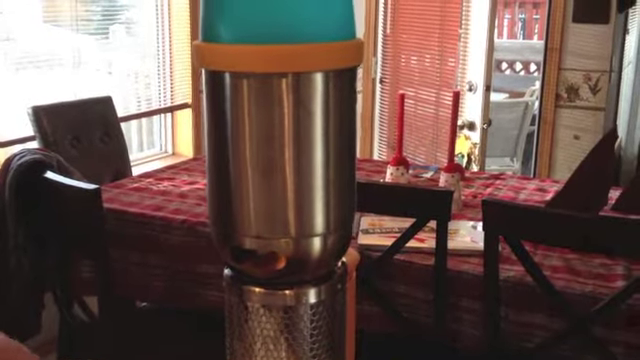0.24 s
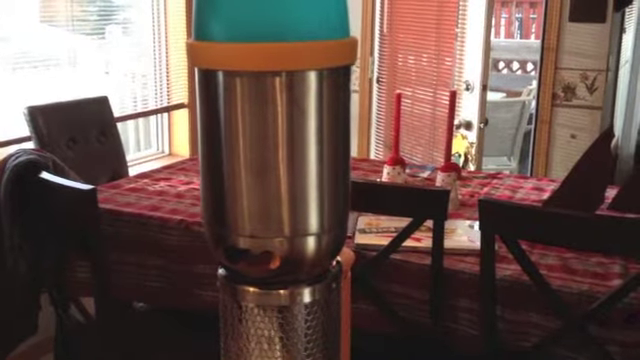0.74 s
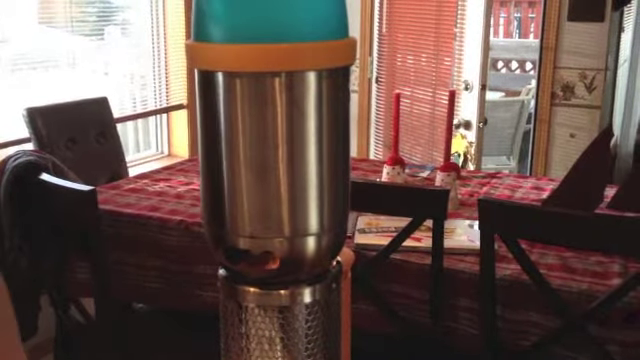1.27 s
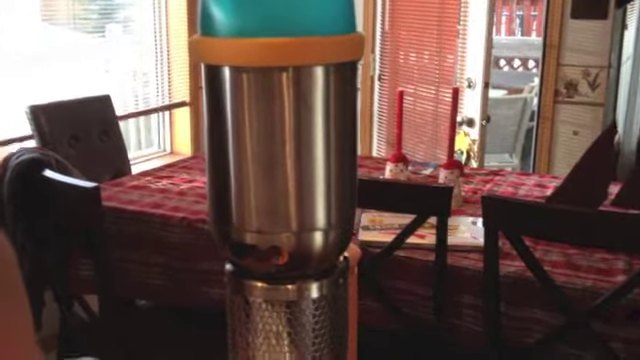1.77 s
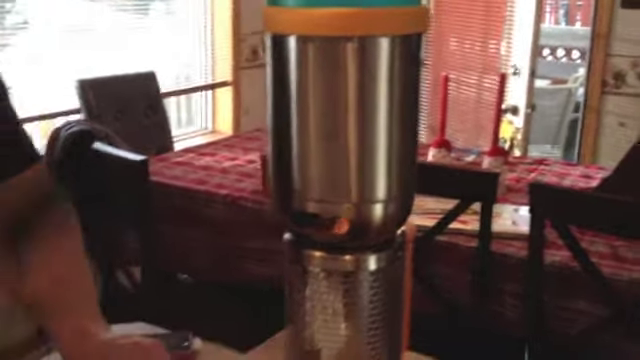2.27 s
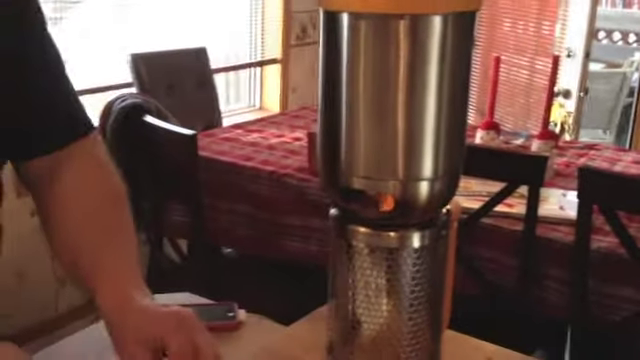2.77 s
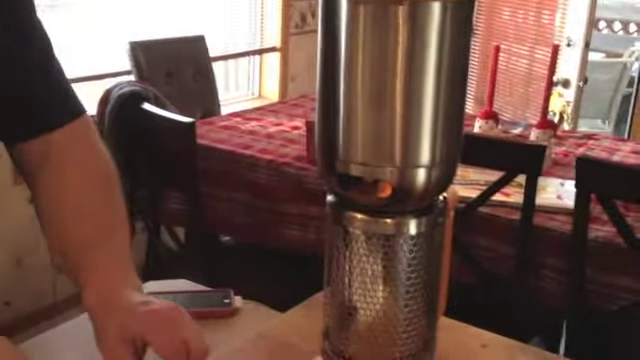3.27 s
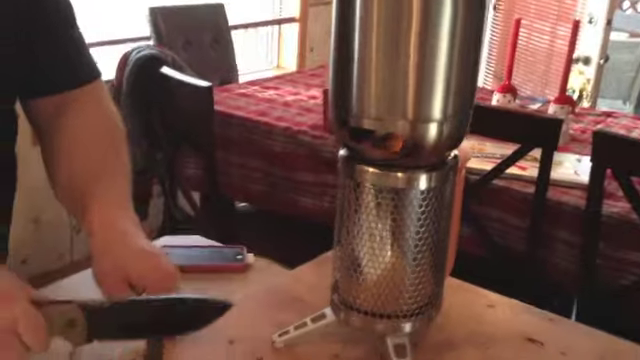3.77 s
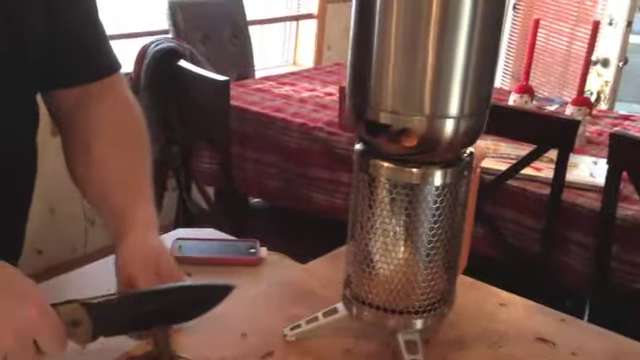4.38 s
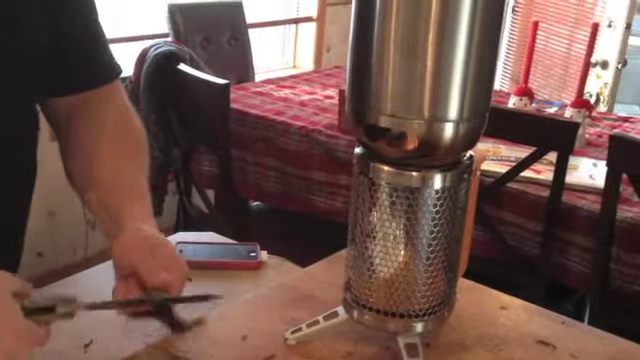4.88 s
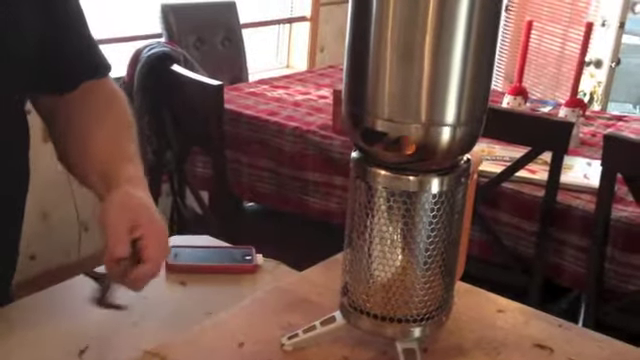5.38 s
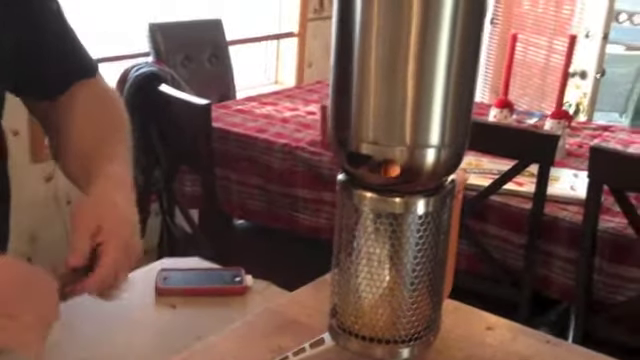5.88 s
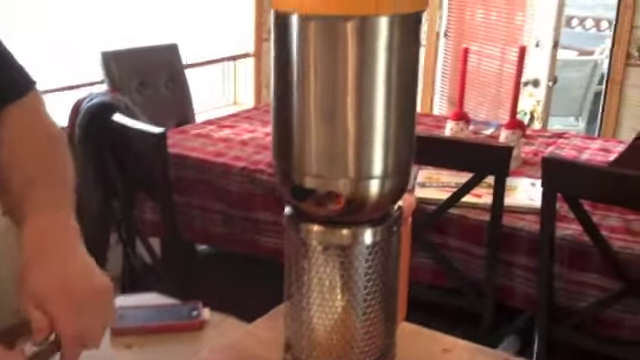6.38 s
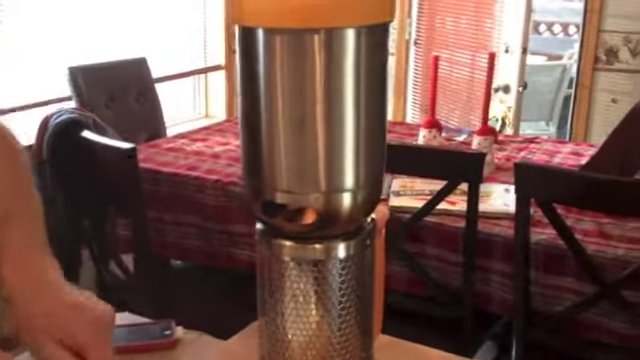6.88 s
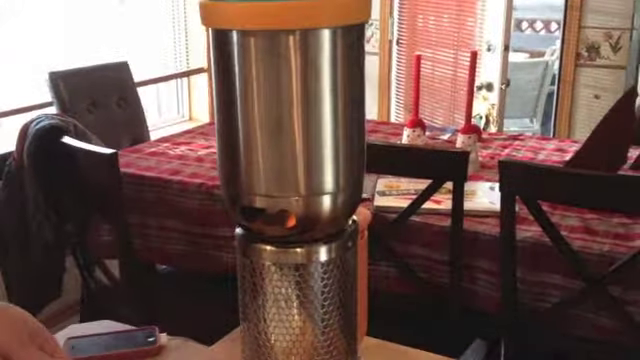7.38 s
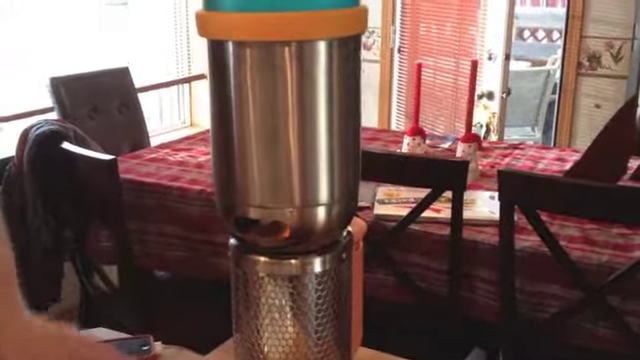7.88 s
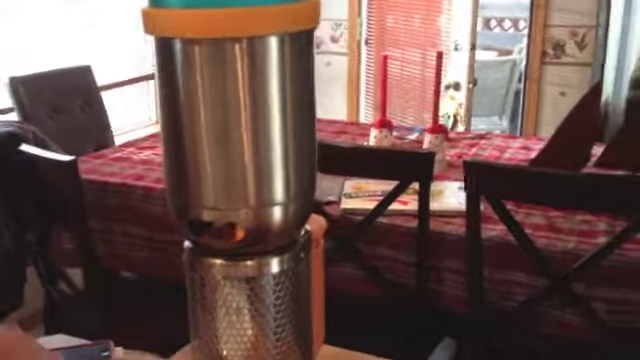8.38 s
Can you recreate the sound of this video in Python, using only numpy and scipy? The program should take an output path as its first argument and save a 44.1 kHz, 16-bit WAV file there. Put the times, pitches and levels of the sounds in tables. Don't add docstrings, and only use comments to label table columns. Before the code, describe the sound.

A small stove's blower rushes steadily in a furnished room, a thin high motor whine cutting in and out over faint ember ticks. Two heavy knocks shake the wooden table, then a knife drops and chatters on the board. A thick dry twig cracks loudly, followed by small snaps and rustling. Close handheld microphone, short room tail, level dipping after loud hits.

```python
import sys
import numpy as np
from scipy import signal
from scipy.fft import rfft, irfft, next_fast_len
from scipy.io import wavfile

SR = 44100
rng = np.random.default_rng(int(sys.argv[2]) if len(sys.argv) > 2 else 0)


def generate_wav(signal):
    frames = np.transpose(np.atleast_2d(signal))
    scaled = np.clip(frames, -1, 1) * 32767
    pcm = np.round(scaled).astype(np.int16)
    wavfile.write(sys.argv[1], SR, pcm)


def convert_level_to_amplitude(level_db):
    exponent = np.asarray(level_db, float) / 20
    return 10 ** exponent


N = 381024
T = np.arange(N) / SR


def rms_one(x):
    return x / np.sqrt(np.mean(x ** 2) + 1e-20)


def at_hz(points, hz):
    points = np.array(points)
    return np.interp(np.log(hz), np.log(points[:, 0]), points[:, 1])


def band(x, low, high):
    return signal.sosfilt(signal.butter(2, [low, min(high, .45 * SR)], "band", fs=SR, output="sos"), x)


def high_pass(x, order, hz):
    return signal.sosfilt(signal.butter(order, hz, "high", fs=SR, output="sos"), x)


def drift(rate):
    r = np.exp(-80 * np.pi * rate / SR)
    white = rng.standard_normal(N // 40 + 2002)
    slow = signal.lfilter([1], [1, -2 * r, r * r], white)[2000:]
    return np.interp(np.arange(N) / 40, np.arange(len(slow)), rms_one(slow))


def ring(clicks, hz, t60):
    r = convert_level_to_amplitude(-60 / (t60 * SR))
    w = 2 * np.pi * hz / SR
    return signal.lfilter([0, np.sin(w)], [1, -2 * r * np.cos(w), r * r], clicks + 1e-18)


def shaped_noise(spectrum):
    size = next_fast_len(N)
    hz = np.maximum(np.arange(size // 2 + 1) * SR / size, 5)
    white = rfft(rng.standard_normal(size))
    return rms_one(irfft(white * convert_level_to_amplitude(at_hz(spectrum, hz)), size)[:N])


def add(out, piece, s):
    i = round(s * SR)
    out[i:i + len(piece)] += piece[:N - i]


def burst(decay_s, low_hz, high_hz):
    t = T[:SR // 40]
    spray = rng.standard_normal(len(t)) * np.exp(-t / decay_s)
    spray[0] = 3.9
    x = band(spray, low_hz, high_hz)
    return x / np.abs(x).max()


# (pitch [Hz], width [Hz], level over the air [dB])
CHAMBER = [(180.6, 32, -15.5), (461.5, 24, -9.5), (505.7, 14, -13.5), (687, 27, -20), (759.5, 124, -7.5)]
# (pitch [Hz], level [dB])
AIR = [(45, -30), (100, -14), (190, -4), (500, -3), (800, -4), (1100, -9), (1600, -13), (2300, -15.),
       (3200, -20), (4650, -23), (5200, -28.5), (7000, -30), (9000, -38.5), (16000, -54)]
AIR_DB = -43.5


def blower():
    air = shaped_noise(AIR) * convert_level_to_amplitude(0.44 * drift(11.3))
    for hz, width, over_db in CHAMBER:
        tone = rms_one(ring(rng.standard_normal(N), hz, 5.5 / width))
        air = air + convert_level_to_amplitude(over_db + 0.5 * drift(3.5)) * tone
    return convert_level_to_amplitude(AIR_DB) * rms_one(air)


# (on [s], off [s], level [dB])
WHINE = [(-.1, .17, -56.5), (.38, 2.4, -57.5), (2.62, 3.86, -60.5), (5.7, 6.09, -56.5), (6.8, 7.55, -59.5),
         (7.59, 8.59, -57.5)]
WHINE_HZ, OVERTONE_DB = 1923, -16.5
WHINE_IDLE_DB, WHINE_SWITCH_S = -72, .02


def whine():
    gain = convert_level_to_amplitude(WHINE_IDLE_DB)
    for on, off, db in WHINE:
        inside_s = np.minimum(T - on, off - T)
        gain = gain + convert_level_to_amplitude(db) * np.clip(inside_s / WHINE_SWITCH_S + .5, 0, 1)
    phase = 2 * np.pi * np.cumsum(WHINE_HZ + 1.34 * drift(3.3)) / SR
    tone = np.sin(phase) + convert_level_to_amplitude(OVERTONE_DB) * np.sin(2 * phase)
    return np.sqrt(2) * gain * convert_level_to_amplitude(1.2 * drift(4.1)) * tone


EMBERS_PER_S, EMBER_DB = 25, -73.5


def embers():
    struck = rng.random(N) < EMBERS_PER_S / SR
    sizes = convert_level_to_amplitude(3.4 * np.minimum(rng.exponential(1, N), 4)) * struck
    spray = signal.lfilter([1], [1, -np.exp(-1 / (.002 * SR))], sizes + 1e-18)
    return convert_level_to_amplitude(EMBER_DB) * band(spray * rng.standard_normal(N), 6000, 15000)


# (time [s], peak level [dB], pitch [Hz])
BUMPS = [
    (.002, -38, 40),
    (1.192, -34.5, 174),
    (1.2, -43, 50),
    (3.865, -48, 40),
    (4.81, -48, 45),
    (6.755, -58, 40),
    (7.4, -52., 45),
    (7.55, -54., 40),
    (7.73, -52., 40),
]
BUMP_T60_S = 0.082


def bumps():
    out, t = np.zeros(N), T[:SR // 4]
    for s, db, hz in BUMPS:
        swell = 1 - np.exp(-t * hz * 2)
        add(out, convert_level_to_amplitude(db - 60 * t / BUMP_T60_S) * swell * np.sin(2 * np.pi * hz * t), s)
    return out


# (pitch [Hz], time to fall 60 dB [s])
ROOM = [(100, 0.38), (300, 0.36), (1000, 0.39), (3000, 0.33), (8000, 0.29), (11000, 0.17), (15000, 0.18)]
BAND_EDGES = 28 * 2 ** np.arange(0, 9.4, 1 / 3)


def tails(s, db, edge, law, colour, t60_scale):
    tail_db, follows, tilt, tilt_per_edge = law
    at = np.round(s * SR).astype(int)
    white, out, power = rng.standard_normal((2, N)), np.zeros(N), 0
    for k, (low, high) in enumerate(zip(BAND_EDGES, BAND_EDGES[1:])):
        hz = np.sqrt(low * high)
        start_db = tail_db + follows * db + (tilt + tilt_per_edge * edge) * np.log2(hz / 1000)
        starts = np.zeros(N)
        starts[at] = convert_level_to_amplitude(2 * start_db)
        fade = convert_level_to_amplitude(-120 / (at_hz(ROOM, hz) * t60_scale * SR))
        energy = signal.lfilter([1], [1, -fade], starts + 1e-18)
        out += convert_level_to_amplitude(at_hz(colour, hz)) * band(white[k % 2] * np.sqrt(energy), low, high)
        power += convert_level_to_amplitude(2 * at_hz(colour, hz)) * (high - low) / (SR / 2)
    return out / np.sqrt(power)


def echoes(events, law, colour, t60_scale):
    s, thud_db, crack_db = np.transpose(events)
    return tails(s, thud_db, crack_db - thud_db, law, colour, t60_scale)


# (pitch [Hz], level [dB])
SNAP_TAIL = [(1290, 15), (2200, -6.5), (3250, -8.5), (3590, -6), (4760, -8), (14600, -17), (15600, -18),
             (16000, -49.5)]


def snaps(events, law, snap_s, low_hz):
    s, db, hz = np.transpose(events)
    out = tails(s, db, np.log2(hz / 7000), law, SNAP_TAIL, t60_scale=1.0)
    for s, db, hz in events:
        add(out, convert_level_to_amplitude(db + 3.0) * burst(snap_s, hz / 1.88, hz * 1.33), s)
    return high_pass(out, 6, low_hz) + convert_level_to_amplitude(-25) * out


# (peak time [s], peak level [dB], swell [dB per s], fade [dB per s])
RUSTLE = [
    (4.81, -59, 330, 280),
    (6.992, -58.5, 600, 210),
    (7.046, -75, 260, 90),
    (7.576, -49.5, 173, 130),
    (7.68, -74, 150, 210),
    (8.65, -47, 192, 208),
]
# (pitch [Hz], level [dB])
RUSTLE_TONE = [(1470, -8), (2500, 2), (6810, 2), (9080, -9), (14500, -8.5), (15500, -10), (16000, -36)]


def rustle():
    level = 0
    for s, db, swell, fade in RUSTLE:
        level = level + convert_level_to_amplitude(db - np.maximum(swell * (s - T), fade * (T - s)))
    return level * rms_one(convert_level_to_amplitude(1.2 * drift(150)) * shaped_noise(RUSTLE_TONE))


# (time [s], peak level [dB], centre pitch [Hz])
SNAPS = [(.303, -58, 11000), (3.866, -47.5, 11000), (1.803, -37, 11000), (1.815, -34, 8000),
         (4.204, -55, 11000), (4.801, -46, 7000), (4.809, -27, 5000), (5.886, -40, 5900),
         (6.134, -63, 8000), (6.995, -62, 12000), (7.034, -48, 10000), (7.042, -40.5, 9000),
         (7.05, -40, 9000), (7.056, -49, 11000), (7.068, -48, 12000), (7.401, -62, 13000),
         (7.412, -63, 13000), (7.498, -49, 13000), (7.506, -46, 11000), (7.537, -41, 7000),
         (7.559, -35, 6000), (7.595, -38, 7000), (7.621, -43, 7000), (7.6254, -28, 7260),
         (7.683, -53, 11000), (7.688, -51, 12500), (7.735, -55, 9000), (8.296, -46, 5170)]
# (time [s], peak level [dB], centre pitch [Hz])
BREAK = [
    (6.737, -29, 7000),
    (6.752, -12, 7120),
    (6.754, -8.5, 4970),
    (6.762, -4.5, 4580),
    (6.7635, -14, 9200),
    (6.767, -15, 5050),
    (6.775, -18, 4500),
    (6.784, -23, 4500),
]
# (tail of a 0 dB snap [dB], dB per dB of snap, tilt [dB per octave],
# added tilt [dB per octave] per octave of pitch over 7 kHz)
SNAP_RING = (-25.5, 0.4, 0.1, 1)
BREAK_RING = (-20, 0.35, -0.2, -2.5)


def twigs():
    small = snaps(SNAPS, SNAP_RING, snap_s=0.002, low_hz=2920)
    thick = snaps(BREAK, BREAK_RING, snap_s=0.0014, low_hz=2900)
    return small + thick


def blows(events, modes, spread_db, crack_s, crack_hz, soft_hz):
    out = np.zeros(N)
    for s, thud_db, crack_db in events:
        click = np.zeros(SR // 4)
        click[0] = 1
        push = signal.lfilter(*signal.butter(1, soft_hz, fs=SR), click)
        luck = rng.normal(0, 1, (len(modes), 2))
        body = 0
        for (hz, db, t60), (a, b) in zip(modes, luck):
            body = body + convert_level_to_amplitude(db + spread_db * a) * np.sign(b) * ring(push, hz, t60)
        add(out, convert_level_to_amplitude(thud_db) * body / np.abs(body).max(), s)
        add(out, convert_level_to_amplitude(crack_db + 8.0) * burst(crack_s, 1300, crack_hz), s)
    return out


# (time [s], thud level [dB], crack level [dB])
LANDING = [
    (5.33, -5, -28),
    (5.387, -19.5, -52),
    (5.415, -17.5, -53),
    (5.424, -20.5, -54),
]
# (pitch [Hz], level [dB], time to fall 60 dB [s])
KNIFE = [(190, -6.5, 0.15), (402, 1, 0.054), (680, -2.5, 0.034), (796, -2.5, 0.032), (967, -2.5, 0.03),
         (284, -6, 0.055), (1690, -5.5, 0.021), (2150, -1.5, 0.012), (2220, -14, 0.096), (2400, -16, 0.18),
         (2500, -6, 0.014), (3410, -11.5, 0.035), (3570, -10, 0.021), (4570, -21, 0.049),
         (5600, -26., 0.026), (7150, -18, 0.044)]
# (pitch [Hz], level [dB])
LANDING_TAIL = [(65, -60), (110, -40), (181, 3), (361, -4), (392, 0.5), (941, -9), (1290, -13.5),
                (2400, -23), (3020, -28), (7250, -45.5), (14400, -77), (16000, -78)]
# (tail of a 0 dB blow [dB], dB per dB of blow, tilt [dB per octave],
# added tilt [dB per octave] per dB of crack over thud)
LANDING_RING = (-19, 0.85, 5, 0.0823)


def knife_landing():
    blade = blows(LANDING, KNIFE, spread_db=0.6, crack_s=0.001, crack_hz=6300, soft_hz=4000)
    blade = high_pass(blade, 2, 130)
    return blade + echoes(LANDING, LANDING_RING, LANDING_TAIL, t60_scale=1.0)


REBOUND_S, REBOUND_DB = .021, -12


def rebounds(events):
    gaps = REBOUND_S * rng.uniform(.5, 1.5, len(events))
    return [(s + gap, thud_db + REBOUND_DB, crack_db + REBOUND_DB)
            for (s, thud_db, crack_db), gap in zip(events, gaps)]


# (time [s], thud level [dB], crack level [dB])
CLATTER = [(5.508, -7, -29), (5.5263, -0.5, -23.5), (5.545, -14, -42), (5.562, -12.5, -55),
           (5.593, -12.5, -43), (5.615, -11, -42), (5.625, -17, -33.5), (5.654, -12.5, -58),
           (5.675, -9.5, -30), (5.712, -24.5, -68), (5.763, -20.5, -51), (5.841, -48, -59)]
# (pitch [Hz], level [dB], time to fall 60 dB [s])
BOARD = [(171, -6, 0.094), (283, -10, 0.098), (387, 2, 0.051), (507, 0, 0.088), (667, 4, 0.027),
         (788, 3, 0.028), (967, -6.5, 0.068), (1210, -6, 0.025), (2060, -1, 0.0099), (3460, -6, 0.016),
         (5640, -28, .03), (7400, -29, 0.044)]
# (pitch [Hz], level [dB])
CLATTER_TAIL = [(65, -49), (110, -22), (160, 0.5), (219, -12.5), (248, 4.5), (392, -4.5), (454, -5),
                (981, -11), (1550, -20.5), (3420, -28), (13500, -61), (16000, -77)]
# ([dB], [dB per dB], [dB per octave], [dB per octave per dB])
CLATTER_RING = (-18, 0.57, 4.5, 0.1259)


def knife_clatter():
    touches = CLATTER + rebounds(CLATTER)
    handle = blows(touches, BOARD, spread_db=0.5, crack_s=0.0023, crack_hz=6060, soft_hz=3060)
    return handle + echoes(CLATTER, CLATTER_RING, CLATTER_TAIL, t60_scale=0.82)


# (time [s], thud level [dB], crack level [dB])
KNOCKS = [
    (1.18, -33.5, -52),
    (1.7758, -4, -18.5),
    (2.525, 3, -11.5),
    (2.607, -19, -26),
]
# (pitch [Hz], level [dB], time to fall 60 dB [s])
TABLE_NEAR = [(165.9, 2, 0.25), (198, 4, 0.1), (262, 2, 0.24), (310, 1.5, 0.11), (362, -8, 0.11),
              (415, 2, 0.14), (460, 6, 0.045), (1150, -8, 0.03), (1510, -21, .02), (2090, 10, 0.011),
              (3650, 3.5, 0.02)]
TABLE_FAR = [(165, -0.5, .18), (198.4, 1.5, .16), (263, 2, 0.11), (288, 1.5, 0.091), (366, -5, .12),
             (420, -6, 0.28), (481, 0, 0.34), (950, -11, 0.017), (1170, -6.5, 0.19), (2150, 6, 0.023),
             (3300, 1, 0.009), (4380, 10.5, 0.0094)]
# (pitch [Hz], level [dB])
KNOCK_TAIL = [(53, -41), (90, -13), (155, -2.5), (323, -3.5), (448, -6), (786, -13.5), (1160, -14),
              (1380, -20.5), (2130, -22.5), (2950, -29.5), (7020, -40), (14400, -65), (16000, -66)]
# ([dB], [dB per dB], [dB per octave], [dB per octave per dB])
KNOCK_RING = (-10., 1.5, 3.5, 0.1365)
NEAR_DB = 5


def table_knocks():
    near = blows(KNOCKS[:2], TABLE_NEAR, spread_db=0.0, crack_s=0.0011, crack_hz=8400, soft_hz=2500)
    far = blows(KNOCKS[2:], TABLE_FAR, spread_db=1.0, crack_s=0.0011, crack_hz=8000, soft_hz=2500)
    return convert_level_to_amplitude(NEAR_DB) * near + far + echoes(KNOCKS, KNOCK_RING, KNOCK_TAIL, t60_scale=1.09)


def scene():
    steady = blower() + whine() + embers()
    handling = 2 * bumps() + rustle() + twigs()
    return (steady + handling + knife_landing() + knife_clatter() + table_knocks())[None]


def top_cut(x):
    return signal.sosfilt(signal.butter(12, 16560, fs=SR, output="sos"), x)


# (time [s], dip [dB])
DUCK = [
    (1.78, 5),
    (2.528, 9),
    (5.53, 3),
    (6.76, 0.3),
]
DUCK_ATTACK_S, DUCK_RELEASE_S = 0.04, 0.96
HISS_DB, HISS_FROM_HZ = -75.5, 10500
PRESENCE_HZ, PRESENCE_WIDTH_HZ, PRESENCE_DB = 13850, 4000, -2.5


def record(dry):
    hiss = convert_level_to_amplitude(HISS_DB) * rms_one(band(rng.standard_normal(N), HISS_FROM_HZ, 18600))
    half_hz = PRESENCE_WIDTH_HZ / 2
    dry = dry + convert_level_to_amplitude(PRESENCE_DB) * band(dry, PRESENCE_HZ - half_hz, PRESENCE_HZ + half_hz)
    rumble = signal.sosfilt(signal.butter(2, 60, fs=SR, output="sos"), dry)
    x = high_pass(dry, 5, 118) + convert_level_to_amplitude(-20.0) * rumble + hiss
    down_db = 0
    for s, db in DUCK:
        since = np.maximum(T - s, 0)
        down_db = down_db + db * (1 - np.exp(-since / DUCK_ATTACK_S)) * np.exp(-since / DUCK_RELEASE_S)
    x = 0.75 * np.tanh(x * convert_level_to_amplitude(-down_db) / 0.69)
    cut = signal.sosfilt(signal.cheby2(12, 30, 15650, fs=SR, output="sos"), x)
    return top_cut(cut)


dry = scene()
out = record(dry)
generate_wav(out)
```